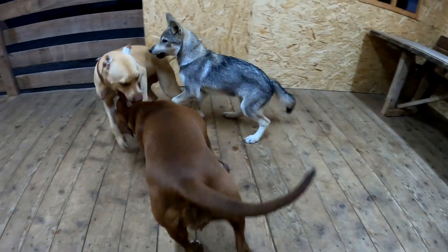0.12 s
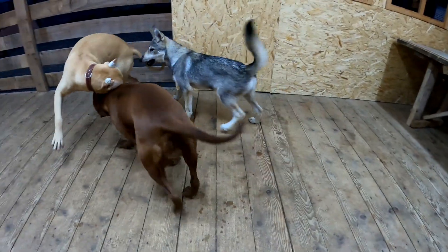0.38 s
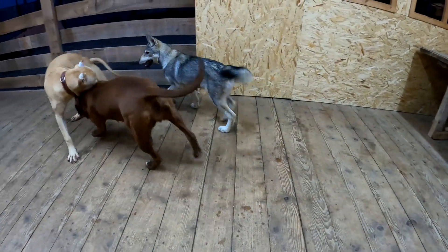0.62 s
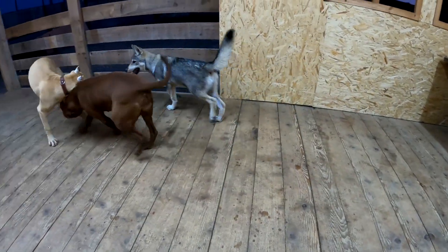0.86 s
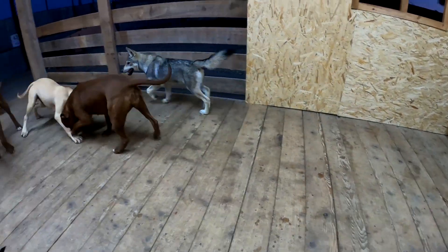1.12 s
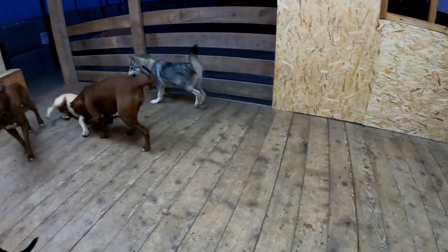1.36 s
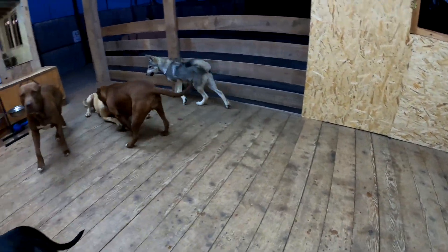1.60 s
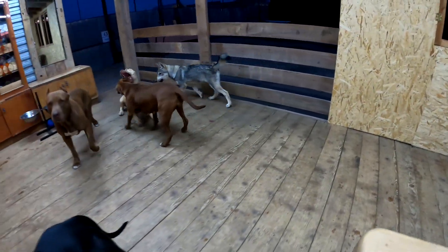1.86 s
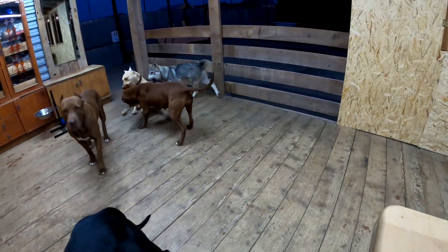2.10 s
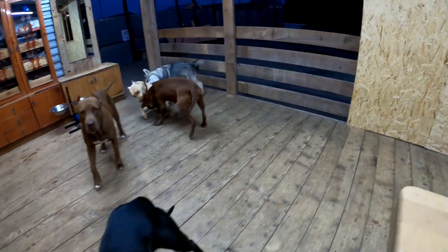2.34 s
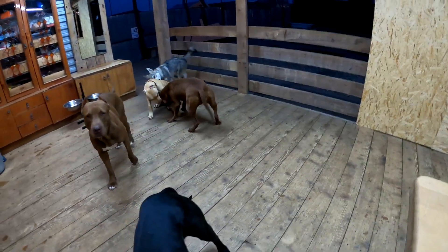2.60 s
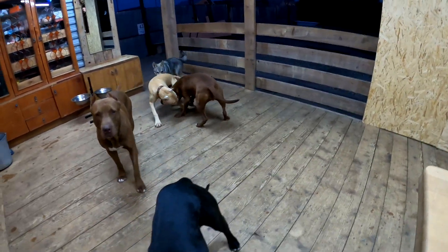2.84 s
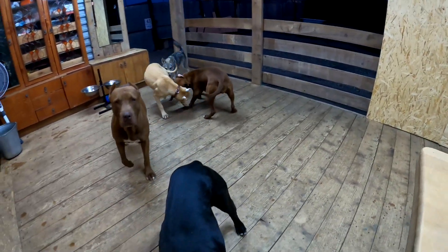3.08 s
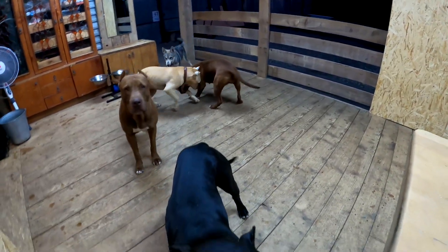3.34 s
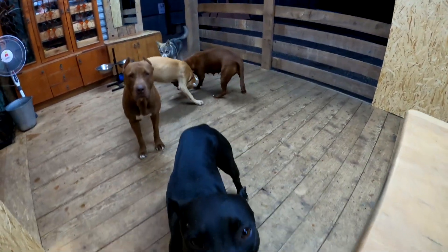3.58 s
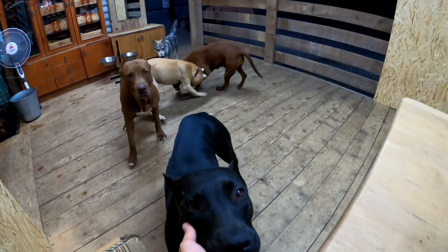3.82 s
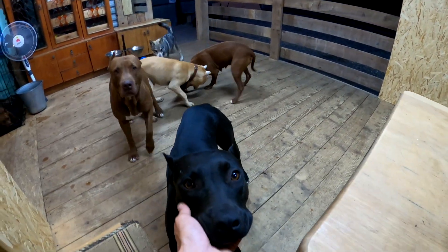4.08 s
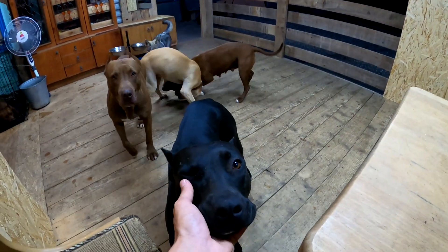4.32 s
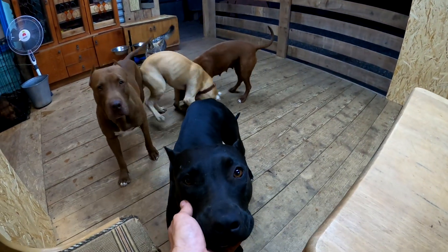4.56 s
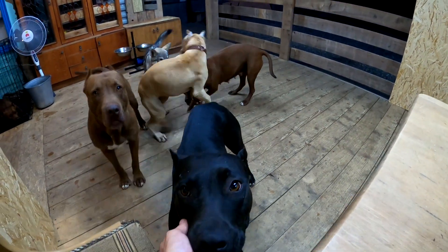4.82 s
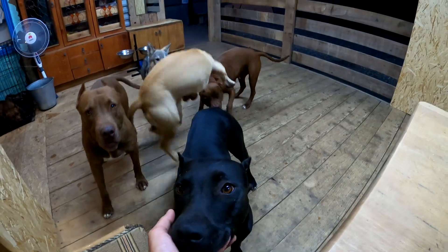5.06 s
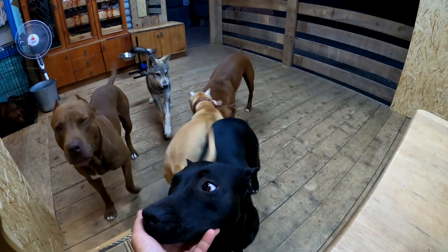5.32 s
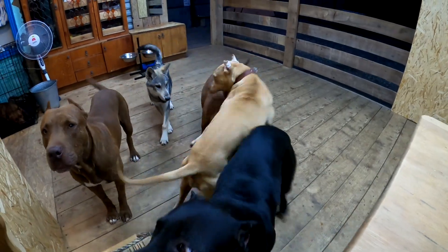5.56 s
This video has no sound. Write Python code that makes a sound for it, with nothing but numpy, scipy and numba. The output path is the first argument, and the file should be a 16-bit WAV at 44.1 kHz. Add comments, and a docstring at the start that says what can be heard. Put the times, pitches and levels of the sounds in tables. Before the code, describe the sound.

Large dogs scuffle on a resonant plank floor in a wooden shed, heard by a slightly muffled hand-held stereo microphone. From 0 to 0.8 s, rapid low thuds, knocks and gritty claw ticks tumble over dragging weight, with a tiny tag clink. Claws scrape around 1.0-1.3 s, then a loud cluster of slams hits at 1.35-1.57 s. It thins out: scratches near 2.05 s, steps at 2.37 and 2.7 s, faint clinks around 2.5 s. Wet jaw smacks come slightly left at 2.95-3.05 s, then a short low grunt at 3.2 s whose pitch dips and recovers, and a very faint wheeze at 3.3 s. A scrape at 3.8 s leads to a sharp claw strike at 3.94 s; irregular steps follow until 5 s. Thin nasal wheezes and faint panting emerge near 5.2 s, among heavy thumps at 5.28, 5.35 and 5.66 s. Short wooden reflections and quiet air throughout.

```python
"""Dogs wrestling in a wooden shed

Large dogs wrestle on the plank floor of a wooden shed, a few metres from a hand-held camera.
Pads and bodies thud and knock as decaying board modes; tags clink as beating pairs of sines.
Claws tick and scratch as noise grains through plank resonances; sliding paws are gritty noise bands.
One dog smacks its jaws (mouth modes), grunts (a hum with overtones), wheezes and pants (shaped noise).
Delay lines make the brief answer of the wooden walls, over a low shuffle and the hush of the room."""
import sys
import numpy as np
from scipy import signal
from scipy.fft import rfft, irfft, next_fast_len
from scipy.io import wavfile
from scipy.ndimage import uniform_filter1d
from numba import njit

SR = 44100
rng = np.random.default_rng(int(sys.argv[2]) if len(sys.argv) > 2 else 0)


def how_loud(loudness_db):
    """Turn decibels into a plain amplitude multiplier (0 dB gives 1, 20 dB gives 10)."""
    steps = np.asarray(loudness_db, float) / 20
    return 10 ** steps


def inscribe(sig):
    """Save sig as 16-bit PCM at rate SR to the path in sys.argv[1].

    A 1-D sig is mono; a 2-D sig holds one channel per row.
    Samples are clipped to [-1, 1] before scaling.
    """
    pcm = np.round(np.clip(np.atleast_2d(sig).T, -1, 1) * 32767)
    wavfile.write(sys.argv[1], SR, pcm.astype(np.int16))


N = 250468
T = np.arange(N) / SR
OPPOSITE = np.array([[1], [-1]])  # left and right in opposite phase

# Modes of the boards on their joists.
# Each row: pitch in Hz, level in dB, t60 in seconds before the ring factor of a blow.
BOARDS = [(39.6, 7, 0.44), (56.9, 9, 0.12), (70, 3, 0.47), (97, 2.5, 0.2), (127.7, 0.5, 0.16),
          (142.75, -3.5, 0.52), (178, -2.5, 0.32), (208, -1, 0.24), (235, 5, 0.14), (273.8, -7.5, 0.34),
          (298.2, -4.5, 0.35), (321.5, 1, 0.29), (366, -0.5, 0.24), (439.5, 5, 0.21), (503, 2, 0.25),
          (569, 1.5, 0.14), (600, 2.5, 0.17), (697, 7.5, 0.11), (746, 1, 0.23), (808, 2.5, 0.2),
          (923.5, -1, 0.17), (990, -1.5, 0.22), (1069, 5, 0.046), (1161, -3, 0.18), (1323, 1, 0.1),
          (1477, 1, 0.093)]
# What the plank face rings with under a claw.
# Each row: pitch in Hz, width in Hz that scales the band around it, level in dB.
FACE = [(985, 52, -7.5), (1170, 340, 5), (1393, 130, -5), (1521, 107, 0), (1634, 94, 1.5), (1753, 140, -1),
        (2053, 360, -0.5), (2500, 210, -8.5), (2850, 230, -33.5), (3610, 62, -5.5), (3720, 280, -23),
        (4500, 310, 0.5), (4920, 250, -0.5), (5630, 730, -0.5), (6330, 490, -5)]


def butter_pass(x, order, hz, kind="bandpass"):
    """Butterworth filter: its slopes fall smoothly outside the passed band."""
    return signal.sosfilt(signal.butter(order, hz, kind, fs=SR, output="sos"), x)


def band(x, low_hz, high_hz):
    """Band-pass, rms 1."""
    y = butter_pass(x, 2, [low_hz, high_hz])
    return y / np.sqrt(np.mean(y ** 2))


def colour(x, points, share=1):
    """Shape the spectrum by (Hz, dB) points, joined along log frequency; share scales the dB."""
    hz, db = np.transpose(points)
    pad = SR // 10
    x = np.pad(x, pad, mode="reflect", reflect_type="odd")
    size = next_fast_len(len(x))
    f = np.maximum(np.fft.rfftfreq(size, 1 / SR), 1)
    gain = how_loud(share * np.interp(np.log(f), np.log(hz), db))
    return irfft(rfft(x, size) * gain, size)[pad:pad + N]


def decay(t, t60):
    """Exponential fade that falls by 60 dB in t60 seconds."""
    return np.exp(-np.log(1000) * t / t60)


def add(out, s, x):
    """Mix a short sound in at a given time in seconds."""
    i = int(s * SR)
    out[..., i:i + x.shape[-1]] += x[..., :N - i]


def grit(rate, spread_db):
    """Tiny catches of claw on grain: random clicks (rate per second) of uneven size, spread slightly widened."""
    hits = rng.random(N) < rate / SR
    return hits * rng.standard_normal(N) * how_loud(spread_db * rng.exponential(size=N))


def hush():
    """Steady air of the shed: coloured noise, alike left and right in the bass."""
    # Spectrum of the air. Each row: frequency in Hz, density in dB per Hz before the level is set.
    air_curve = [(18, -39), (30, 10.5), (71, -10), (185, -11), (253, -16.5), (364, -37.5), (511, -18),
                 (680, -84), (928, -24), (8920, -26.5), (15000, -44.5)]
    level_db = -50
    mid, side = (colour(rng.standard_normal(N), air_curve) for _ in range(2))
    side = butter_pass(side, 2, [1200, 9000])
    return how_loud(level_db) * (mid + side * OPPOSITE) / np.sqrt(np.mean(mid ** 2))


def patches(count):
    """Gains that come and go as paws catch and let go, one row for each band."""
    patchy_db, per_s = 2.8, 25
    k = int(SR / per_s)
    held = np.repeat(rng.standard_normal((count, N // k + 1)), k, axis=1)[:, :N]
    return how_loud(patchy_db * uniform_filter1d(held, k // 2))


def face(x):
    """The same scratching heard through each resonance of the plank face, one row each."""
    return np.array([how_loud(db) * band(x, hz - 0.49 * width, hz + 0.92 * width) for hz, width, db in FACE])


def slide():
    """Dragged weight rumbles in the boards; dragged claws scrape in fine grains, unlike left and right."""
    # Restless shuffling between the blows.
    # Each row: time in seconds, level of the bass, of the middle and of the treble in dB.
    shuffle = [(0.0, -22, -23, -53), (.1, -35, -47.5, -47), (.3, -30, -37.5, -49), (.39, -42, -47, -46.5),
               (0.54, -45, -46.5, -44), (1.03, -29.5, -40.5, -50), (1.2, -34.5, -50.5, -51),
               (1.345, -54, -32, -41), (1.37, -56, -39, -51.5), (1.41, -48.5, -29.5, -42.5),
               (1.53, -28, -23.5, -53), (1.68, -40, -45, -42.5), (2.2, -50.5, -48.5, -52),
               (2.59, -46.5, -50.5, -45), (2.81, -51, -53.5, -57), (3.31, -39, -53, -49),
               (3.8, -51.5, -61, -55), (3.98, -40.5, -58, -45.5), (4.38, -54.5, -41, -46),
               (4.7, -37, -52, -45.5), (4.97, -42, -57, -51.5), (5.28, -44, -45, -50.5),
               (5.68, -43, -46.5, -43.5)]
    fizz_db = -9
    extra_fizz_db = 1.5  # a fast skid is brighter than a shuffle
    s, *columns = np.transpose(shuffle)
    skid_gains = skids()
    bass, middle, treble = how_loud([np.interp(T, s, c) for c in columns]) + skid_gains

    rumble, rub = grit(600, 1.2), grit(1500, 1.5)
    low = bass * band(rumble, 31, 182) + middle * patches(1)[0] * band(rub, 160, 770)

    mid, side = (grit(9000, 0.56) for _ in range(2))
    ringing = (patches(len(FACE)) * face(mid)).sum(axis=0) / 4
    ringing += 0.75 * patches(1)[0] * band(mid, 1260, 3850)
    scrape = treble * (ringing + 0.51 * OPPOSITE * band(side, 900, 4400))

    fizz_gain = how_loud(fizz_db) * (treble * patches(1)[0] + how_loud(extra_fizz_db) * skid_gains[2])
    fizz_side = band(band(side, 4000, 8500), 4000, 8500)
    fizz = fizz_gain * (band(mid, 4660, 10300) + 0.74 * OPPOSITE * fizz_side)
    return low + scrape + fizz


def strike_boards(level_db, hz, ring, octaves, push_s, chance):
    """One blow: the spot where it lands favours the modes near one pitch; a longer push swells slower."""
    t = np.arange(int(.4 * SR)) / SR
    mode_hz, mode_db, t60 = (c[:, None] for c in np.transpose(BOARDS))
    nearness = np.exp(-(np.log2(mode_hz / hz) / octaves) ** 2 / 2)
    share = how_loud(mode_db + 2 * chance[0]) * nearness
    heard = share[:, 0] > share.max() / 100  # skip modes 40 dB below the strongest
    phase = 2 * np.pi * mode_hz * (1 + 0.022 * chance[1]) * t[None] + 1.04 * chance[2]
    fade = decay(t, t60[heard] * max(ring, .15))
    x = np.sum(share[heard] * fade * np.sin(phase[heard]), axis=0)
    x = x * (1 - np.exp(-t / push_s)) ** 2
    # the strength of the blow sets the energy of its first 60 ms; peaks stand about three times higher
    return how_loud(level_db) * x / np.sqrt(np.mean(x[:int(.06 * SR)] ** 2)) / 3


def paws():
    """Soft thuds and hard knocks on the same boards; each knock adds a clack of higher modes."""
    # Soft pads taking weight.
    # Each row: start in seconds, approximate peak in dB, favoured pitch in Hz, ring factor on the t60.
    pad_blows = [(.003, -13, 88, 0.3), (0.036, -8.5, 95, 0.6), (.064, -16.5, 107.5, 0.77),
                 (0.1, -17.5, 96, 0.72), (0.138, -16.5, 147, 0.47), (0.211, -15, 127, 1),
                 (0.257, -20, 120, 0.55), (0.486, -20, 128, .6), (0.585, -31, 98, 0.5),
                 (.735, -15.5, 97, .7), (0.793, -22, 76, 0.67), (0.932, -31, 52.7, 0.27),
                 (1.002, -21.5, 57.7, 0.82), (1.101, -23.5, 80, 1), (1.35, -4.5, 178, 0.42),
                 (1.374, -20, 100.5, 0.87), (1.44, -15.5, 108.4, 0.4), (1.54, -13, 106, .6),
                 (1.563, -15.5, 98.6, .6), (1.621, -24.5, 89.4, .7), (1.699, -28.5, 69.7, 0.84),
                 (2.255, -31, 72, 0.37), (2.381, -16.5, 90.7, 0.94), (2.67, -28, 73, .39),
                 (2.742, -18, 75, 0.56), (2.792, -26, 84.5, .7), (2.827, -34, 187, 0.54),
                 (2.94, -28, 145, 1), (3.119, -31.5, 69.4, 0.82), (3.583, -27.5, 200, 0.23),
                 (3.794, -29, 210, 0.2), (3.816, -24, 155, 0.59), (3.955, -20, 130, 0.69),
                 (3.981, -13.5, 74.3, 0.86), (4.071, -25, 70.5, 0.14), (4.286, -25.5, 99, 1),
                 (4.428, -17, 84, 0.95), (4.531, -21, 52, 0.79), (4.586, -17, 77, 1),
                 (4.757, -32.5, 85, 0.5), (4.887, -23.5, 41, 0.68), (4.983, -20.5, 61.6, 0.71),
                 (5.147, -28, 76, 0.52), (5.277, -9, 44.2, .8), (5.29, -17.5, 92, .5),
                 (5.352, -7, 105, 0.58), (5.389, -18, 62.5, 0.99), (5.402, -20.5, 113, .6),
                 (5.549, -34.5, 98, 0.55), (5.656, -7.5, 101.6, 1)]
    # Hard knocks of bone and heel. Each row: start in seconds, approximate peak in dB, favoured
    # pitch in Hz, clack in dB over the knock, clack pitch in Hz, ring factor on the t60.
    heel_blows = [(.005, -16, 246, -2, 466, 0.58), (.03, -16.5, 294, -10, 524, 0.7),
                  (0.134, -38, 173, 10.5, 580, .7), (0.219, -27.5, 190, 6, 650, 0.51),
                  (0.321, -25.5, 188, -10, 726, 0.89), (0.405, -25, 178, -20, 920, 0.47),
                  (0.424, -28, 300, -1.5, 970, 1), (.479, -19.5, 230, 0.5, 556, 0.53),
                  (.481, -24, 397, -3.5, 980, 0.58), (.527, -20, 190, -9.5, 580, 0.74),
                  (.684, -41, 464, 15.5, 1050, 0.9), (0.731, -21.5, 303, -3, 940, 0.35),
                  (.743, -17, 197, -4.5, 494, 0.21), (0.759, -18.5, 183, -9.5, 590, 0.33),
                  (0.893, -37.5, 350, 2.5, 610, 1), (1.1, -18, 366, -3.5, 487, 1),
                  (1.14, -16.5, 438, -5, 485, 0.51), (1.349, -4, 320, -9, 770, 0.54),
                  (1.351, -7.5, 457, -15, 1050, 0.69), (1.366, -16.5, 298, -11, 900, 0.71),
                  (1.381, -9, 204, -17, 915, 0.65), (1.393, -9, 415, -17, 900, .6),
                  (1.415, -22, 340, -10, 600, 0.61), (1.445, -21.5, 298, -12, 527, 0.86),
                  (1.489, -18, 250, -2.5, 566, 0.36), (1.492, -25, 800, -1.5, 1310, 0.26),
                  (1.505, -23.5, 298, -4.5, 1210, 1), (1.532, -11, 455, -4.5, 803, 0.51),
                  (1.557, -18, 202, -7, 515, .6), (2.059, -34.5, 445, 6, 910, 1),
                  (2.314, -37, 396, -14, 541, 1), (2.368, -23, 295, -3, 710, 0.82),
                  (2.439, -24.5, 203, -14, 990, 0.36), (2.574, -37, 477, -14, 600, 0.8),
                  (2.664, -22.5, 333, -22, 1150, 0.42), (2.675, -33, 380, 1, 634, .6),
                  (2.695, -21.5, 342, -7, 594, 0.69), (2.721, -24.5, 187, -7, 420, 1),
                  (3.327, -21, 232, -3.5, 660, 0.6), (3.329, -32, 406, 1.5, 890, 1),
                  (3.348, -30, 320, -6, 835, 1), (3.37, -23, 200, -10, 705, 0.59),
                  (3.444, -28, 185, -6, 746, 0.49), (3.577, -32.5, 185, -12, 1110, 0.92),
                  (3.825, -16.5, 189, -12.5, 503, .7), (3.943, -19.5, 235, -4.5, 1000, 0.92),
                  (3.947, -28.5, 480, -0.5, 1400, 1), (4.048, -23, 178, -9.5, 456, 0.81),
                  (4.056, -27, 328, -9.5, 960, 0.57), (4.189, -16.5, 233, -6, 565, 0.49),
                  (4.2, -19.5, 228, 0, 525, 0.73), (4.224, -24, 580, -11, 586, 0.61),
                  (4.237, -23, 214, -6, 580, 0.17), (4.264, -20, 226, -10.5, 670, 0.36),
                  (4.274, -22, 218, -6, 553, 0.64), (4.427, -32.5, 250, -5, 497, .7),
                  (4.439, -15.5, 168, -18, 497, 0.55), (4.517, -26.5, 247, -1.5, 985, 0.35),
                  (4.602, -28, 233, -8, 608, 0.93), (4.863, -35.5, 212, -7, 980, .7),
                  (4.985, -21.5, 337, -7.5, 486, 0.91), (5.161, -29, 203, -6.5, 480, 0.81),
                  (5.268, -19, 261, 0.5, 690, .5), (5.284, -14, 288, -4.5, 560, 0.35),
                  (5.302, -25.5, 276, 7.5, 585, 0.5), (5.351, -13, 490, -12, 1410, 0.41),
                  (5.363, -9, 302, -11.5, 490, 0.75), (5.396, -19, 277, -16, 517, 0.53),
                  (5.43, -33, 310, -15, 600, 0.53), (5.568, -29, 200, -33.5, 485, 0.38),
                  (5.662, -21, 186, -4, 875, 0.9)]
    pad_push_s, heel_push_s, clack_push_s = 0.0049, 0.0015, 0.0005
    pad_octaves, heel_octaves, clack_octaves = 0.4, 0.22, 0.2
    out = np.zeros(N)
    chance = rng.standard_normal((len(pad_blows) + len(heel_blows), 3, len(BOARDS), 1))
    for (s, db, hz, ring), c in zip(pad_blows, chance):
        add(out, s, strike_boards(db, hz, ring, pad_octaves, pad_push_s, c))
    for (s, db, hz, clack_db, clack_hz, ring), c in zip(heel_blows, chance[len(pad_blows):]):
        add(out, s, strike_boards(db, hz, ring, heel_octaves, heel_push_s, c))
        clack = strike_boards(db + clack_db, clack_hz, 1.23 * ring, clack_octaves, clack_push_s, c)
        add(out, s - .001, clack)  # each clack starts 1 ms before its row's time
    return out


def claws():
    """A gritty scratch that swells and dies away, ringing the plank face most near its own pitch."""
    # Claws striking wood. Each row: start in seconds, approximate peak in dB, brightest pitch in Hz,
    # rise in seconds, level in dB of the added top.
    strokes = [(.003, -19.5, 1200, 0.00069, -25), (0.0165, -28, 1750, 0.00068, 9),
               (.0917, -24.5, 3200, 0.003, -7), (0.1827, -25.5, 4500, 0.0077, -3.5),
               (0.214, -20, 1210, 0.00091, -18), (0.251, -22.5, 3500, 0.0007, -45),
               (.3351, -30, 1430, 0.0015, -25), (0.407, -31.5, 3300, 0.0036, -15),
               (0.42, -22, 2390, 0.0025, -20.5), (.458, -49, 3300, 0.0055, -24),
               (0.476, -21, 1270, 0.00063, -21), (0.5186, -21, 1400, 0.0014, -35),
               (0.581, -24.5, 2200, 0.00084, -36), (.6405, -23, 2890, 0.0025, -4),
               (0.6822, -17.5, 1420, 0.0036, -25), (0.7334, -21.5, 1400, 0.024, -11),
               (0.781, -26, 1330, 0.0043, -26.5), (.893, -37, 2370, .004, -2),
               (0.9728, -19.5, 2480, 0.0077, -46), (1.016, -26, 2400, 0.0037, -2),
               (1.096, -20.5, 1200, 0.0026, -30), (1.123, -33, 1200, 0.0064, -8),
               (1.24, -23.5, 1140, 0.013, -25), (1.3448, -26.5, 1230, .004, -22),
               (1.409, -20.5, 2050, .02, -18), (1.42, -24, 2640, 0.0087, -18),
               (1.444, -35, 2900, .006, -28), (1.487, -21, 1220, 0.003, -20),
               (1.523, -24.5, 1390, 0.0032, -28), (1.58, -30, 1290, 0.0022, -4),
               (1.64, -27, 1300, 0.0023, -31), (1.749, -32, 3280, 0.0036, -35),
               (1.816, -29, 2160, 0.033, -38), (1.958, -28.5, 2550, 0.0046, -22),
               (2.051, -21.5, 2340, 0.015, -26), (2.06, -20, 1560, 0.003, -17),
               (2.2306, -31.5, 1400, 0.0037, -28), (2.3135, -30, 2860, 0.0034, -26),
               (2.365, -17, 1280, 0.008, -32), (2.377, -20.5, 2850, 0.0099, -16),
               (2.427, -37, 2500, 0.01, -26), (2.442, -22.5, 1170, 0.0037, -13),
               (2.6624, -18, 1270, 0.0019, -34), (2.84, -40, 4500, 0.0021, -2),
               (2.95, -34, 2500, .002, -9.5), (3.159, -32.5, 2200, 0.0025, -35),
               (3.178, -35.5, 4400, 0.0012, -31), (3.3247, -26, 2390, 0.0011, -34),
               (3.35, -36, 1900, .01, -32), (3.4385, -27, 1300, 0.004, -23),
               (3.791, -16.5, 3070, 0.035, -8), (3.9388, -11.5, 1820, 0.0022, -21.5),
               (3.968, -30, 1640, 0.006, -36), (4.0474, -24.5, 1640, .0024, -18),
               (4.188, -24.5, 1270, 0.004, -6.5), (4.362, -20.5, 2200, 0.0083, -29),
               (4.369, -22, 3600, 0.0015, -25), (4.428, -22.5, 2730, 0.0016, -16),
               (4.5141, -19, 2140, 0.00095, -34), (4.5773, -29, 2050, 0.0038, 14),
               (4.7494, -39, 1870, 0.003, -44), (4.9827, -27, 1400, 0.0006, -6),
               (5.019, -27.5, 2600, 0.016, -44), (5.07, -34, 2200, 0.0085, -35),
               (5.131, -38, 1370, 0.0033, -14), (5.1692, -36, 1580, .006, -3),
               (5.199, -49, 1020, .004, -32), (5.267, -19.5, 1300, 0.021, -9.5),
               (5.3497, -17.5, 1390, 0.0084, -6.5), (5.6567, -27, 1170, 0.0033, -26)]
    scratch_t60_s, side_db = 0.19, -7.5
    spot_scatter_db, spot_detune = 3.5, 0.05
    half_octaves = 0.36  # the scratch's own band reaches this far either side of its pitch
    out, size = np.zeros((2, N)), int(.3 * SR)
    t = np.arange(size) / SR
    face_hz = np.array(FACE)[:, 0]

    rough = np.append(grit(14000, 1.4), np.zeros(2 * size))
    aside = band(band(rng.standard_normal(len(rough)), 500, 8000), 500, 8000)
    rings, dull = face(rough), band(rough, 640, 2970)
    bright, top = band(rough, 1820, 3790), band(rough, 2600, 9300)
    chance = rng.standard_normal((len(strokes), len(FACE) + 1))
    for (s, db, hz, rise, top_db), (*c, spot) in zip(strokes, chance):
        start = int(s * SR)
        part = slice(start, start + size)
        nearness = np.exp(-(np.log2(face_hz / hz) / 0.089) ** 2 / 2)
        share = how_loud(spot_scatter_db * np.array(c)) * (0.84 + nearness)
        x = share @ rings[:, start:start + 2 * size] / np.linalg.norm(share)
        # every spot on the planks is tuned a little differently
        x = np.interp(t * (1 + spot_detune * spot), np.arange(2 * size) / SR, x)
        x = x + 0.32 * band(rough[part], hz * 2 ** -half_octaves, hz * 2 ** half_octaves)
        # a low stroke is duller, a high one brighter
        x = x + 0.75 * (dull[part] * (1500 / hz) ** 2 + 0.43 * bright[part] * hz / 2000)
        # the top dies fastest: it is mostly the first tick
        x = x + how_loud(top_db) * top[part] * (1 + 2.1 * np.exp(-t / 0.0061))
        x = x + how_loud(side_db) * aside[part] * OPPOSITE
        tick = .5 * np.exp(-t / 0.0017) * np.minimum(t / 0.00029, 1)
        swell = 1 - np.exp(-t / rise)
        x = x * (tick + swell) * decay(t, scratch_t60_s)
        # the energy of the first 30 ms sets the level
        add(out, s, how_loud(db) * x / np.sqrt(np.mean(x[:, :int(.03 * SR)] ** 2)) / 4.24)
    return out


def clutter(x, gain=0.63):
    """Furniture and slats scatter the sound: chained all-pass delays turn each click into a dense spray."""
    # Delays of the scattering surfaces, a single list [samples].
    scatter_lags = [97, 151, 229, 347]
    for lag in scatter_lags:
        taps = np.zeros(lag + 1)
        taps[0], taps[-1] = -gain, 1
        x = signal.lfilter(taps, taps[::-1], x)
    return x


@njit
def walls(x, lags, gain, damp):
    """Eight delay lines that feed each other, duller on every round."""
    line, soft, out = np.zeros((8, 4096)), np.zeros(8), np.zeros((2, len(x)))
    for i in range(len(x)):
        total = 0.
        for k in range(8):
            returned = gain[k] * line[k, (i - lags[k]) & 4095]
            soft[k] += (1 - damp) * (returned - soft[k])
            total += soft[k]
            out[k % 2, i] += soft[k]
        for k in range(8):
            # the tiny offset keeps the fading numbers from slowing the loop
            line[k, i & 4095] = x[i] + 1e-18 + soft[k] - total / 4
    return out


def shed(near):
    """Wooden walls answer the scattered sound; two close ports hear only its long waves alike."""
    # Delays between the walls, a single list [samples].
    wall_lags = np.array(np.array([611, 797, 983, 1187, 1361, 1583, 1831, 2083]))
    t60_s, damp = 0.21, 0.4  # t60 before damping, which shortens the treble
    echo_db, scatter_db = -7, -15
    spray = clutter(near.mean(axis=0))
    echo = walls(spray, wall_lags, how_loud(-60 * wall_lags / SR / t60_s), damp)
    echo = butter_pass(echo, 1, 250, "highpass")
    mid, side = echo.mean(axis=0), (echo[0] - echo[1]) / 2
    side = butter_pass(side, 1, [450, 8000])
    # the scattered treble differs between the ports
    scattered = butter_pass(spray, 4, [3500, 9000])
    side = how_loud(echo_db) * 0.49 * side + how_loud(scatter_db) * scattered
    return how_loud(echo_db) * mid + side * OPPOSITE


def ticks():
    """A bare click of horn on wood: a broad burst that dies within a few hundredths of a second."""
    # Single nails tapping the wood. Each row: time in seconds, peak in dB, pitch in Hz.
    taps = [(0.1316, -29, 2770), (0.2174, -33, 2780), (0.2531, -16.5, 3700), (0.3347, -28.5, 2500),
            (0.4197, -45, 3170), (.464, -31, 3300), (0.48, -21, 1400), (0.5194, -38, 3200),
            (0.583, -25.5, 4040), (0.6446, -27.5, 2870), (0.6828, -19, 1490), (0.7302, -17.5, 1500),
            (0.785, -17, 3970), (0.894, -31, 1200), (0.9383, -37, 4120), (0.9725, -19, 3300),
            (1.347, -27, 5000), (1.49, -22, 1500), (1.58, -31, 6000), (2.5376, -38, 4410),
            (3.051, -38, 2560), (3.7755, -36, 2720), (3.9432, -14.5, 3500), (4.188, -30, 1210),
            (4.268, -29, 2900), (4.3768, -17.5, 3600), (4.5175, -19, 2900), (4.8633, -36, 2600),
            (5.1326, -34.5, 2970), (5.246, -37, 2810), (5.265, -42, 5260), (5.279, -23, 2850),
            (5.3547, -17.5, 2530)]
    t60_s, half_octaves = 0.027, 0.72
    out, t = np.zeros(N), np.arange(int(.02 * SR)) / SR
    for (s, db, hz), noise in zip(taps, rng.standard_normal((len(taps), len(t)))):
        x = band(noise, hz * 2 ** -half_octaves, hz * 2 ** half_octaves) * decay(t, t60_s)
        add(out, s - .001, how_loud(db) * x / np.abs(x).max())  # starts 1 ms before its row's time
    return out


def tags():
    """A close pair of modes, beating as it dies."""
    # Collar tags and buckles clinking faintly.
    # Each row: start in seconds, level of the lower mode in dB, its pitch in Hz, t60 in seconds.
    clinks = [(.2, -31, 3740, 0.048), (.465, -37, 3260, 0.088), (.655, -44, 5000, .15),
              (.685, -50, 4500, .12), (1.755, -39, 3330, 0.12), (1.815, -39, 2230, 0.12),
              (1.96, -44, 2600, 0.088), (2.455, -33, 1205, 0.17), (2.502, -45, 1240, 0.093),
              (2.537, -34, 4340, 0.055), (3.09, -50, 2200, .08), (3.18, -37, 4260, 0.046),
              (3.275, -43.5, 2960, .08), (3.365, -44, 2120, .1), (4.515, -30, 2130, 0.071)]
    out, t = np.zeros(N), np.arange(int(.15 * SR)) / SR
    for (s, db, hz, t60), c in zip(clinks, rng.standard_normal(len(clinks))):
        upper_hz = hz * (1.03 + 0.0079 * c)
        x = np.sin(2 * np.pi * hz * t) + 0.69 * np.sin(2 * np.pi * upper_hz * t)
        add(out, s, how_loud(db) * x * (1 - np.exp(-t / 0.0011)) * decay(t, t60))
    return out


def skids():
    """Bass, middle and treble gain of the longer skids: a quick swell, a hold, a fade."""
    # Longer skids over the planks.
    # Each row: start in seconds, length before the fade in seconds, bass, middle and treble in dB.
    drags = [(0.466, 0.14, -28.5, -43, -69), (1.114, 0.18, -46.5, -34, -37.5),
             (1.495, 0.069, -28, -37, -46), (3.334, 0.13, -41.5, -50, -55.5), (3.927, 0.063, -44, -38, -71),
             (4.532, 0.074, -34.5, -43, -51), (4.984, 0.083, -34, -41, -49.5)]
    rise_s, fade_s = 0.0084, 0.027
    out = np.zeros((3, N))
    for s, length, *db in drags:
        swell = np.clip((T - s) / rise_s, 0, 1)
        out += how_loud(db)[:, None] * swell * np.exp(-np.maximum(T - s - length, 0) / fade_s)
    return out


def smacks():
    """A wet pop rings the open mouth as decaying modes; it stands to the left."""
    # Jaws of the nearest dog smacking open and shut.
    # Each row: start in seconds, peak in dB before panning, ring factor on the t60.
    pops = [(2.902, -51, 0.81), (2.919, -46, 1), (2.95, -32, 0.47), (3.029, -32.5, 0.51), (3.05, -22, 0.54),
            (3.081, -44, 0.9), (3.557, -31, 0.47)]
    # Modes of the mouth. Each row: pitch in Hz, level in dB, t60 in seconds before the ring factor.
    mouth_modes = [(195, 4.5, 0.094), (495, 8, 0.044), (650, -3.5, 0.091), (1406, 4.5, 0.019),
                   (1590, -11.5, 0.067), (2550, -4.5, 0.027)]
    pan_db = 3.5  # left minus right
    out, t = np.zeros(N), np.arange(int(.15 * SR)) / SR
    hz, mode_db, t60 = (c[:, None] for c in np.transpose(mouth_modes))
    chance = rng.standard_normal((len(pops), 2, len(mouth_modes), 1))
    for (s, db, ring), c in zip(pops, chance):
        fade = decay(t, t60 * ring) * (1 - np.exp(-t / 0.0018))
        tone = np.sin(2 * np.pi * hz * (1 + 0.057 * c[1]) * t)
        x = np.sum(how_loud(mode_db + 0.78 * c[0]) * fade * tone, axis=0)
        add(out, s, how_loud(db) * x / np.abs(x).max())
    return out * how_loud(pan_db * OPPOSITE / 2)


def grunt():
    """A hummed tone whose pitch sags and recovers; its overtones ring the mouth, most near start and end."""
    # One short grunt.
    # Each row: time in seconds, pitch in Hz, level of the fundamental in dB, of the overtones in dB.
    contour = [(3.157, 195, -43, -40), (3.167, 178, -26, -37.5), (3.186, 141.5, -26.5, -52),
               (3.205, 139, -25, -50), (3.225, 140, -23.5, -57), (3.243, 148, -25, -47),
               (3.253, 171, -35, -39), (3.268, 178.5, -27, -52), (3.289, 169, -44, -54)]
    # Mouth resonances. Each row: centre in Hz, width in Hz, level in dB.
    formants = [(292, 68, 6), (490, 120, 4), (1400, 150, -22), (1580, 150, -3.5)]
    jitter = 0.006  # rms share of the pitch
    s, hz, db, upper_db = np.transpose(contour)
    wobble = uniform_filter1d(rng.standard_normal(N), size=200)
    pitch = np.interp(T, s, hz) * (1 + jitter * wobble / wobble.std())
    phase = 2 * np.pi * np.cumsum(pitch) / SR
    gate = np.clip(np.minimum(T - s[0], s[-1] - T) / 0.01, 0, 1)
    order = np.arange(2, 14)[:, None]
    share = sum(how_loud(g) / (1 + (2 * (order * pitch - f) / width) ** 2) for f, width, g in formants)
    upper = how_loud(np.interp(T, s, upper_db)) * np.sum(share * np.sin(order * phase), axis=0)
    hum = how_loud(np.interp(T, s, db)) * np.sin(phase)
    return np.sqrt(2) * gate * (hum + upper)


def wheezes():
    """A narrow, wavering whistle of air that glides a little: a tone modulated by slow noise."""
    # Thin wheezes in a dog's nose.
    # Each row: start in seconds, length of the glide in seconds, level in dB, start and end pitch in Hz.
    whistles = [(3.298, 0.27, -52, 888, 910), (4.718, 0.063, -53, 910, 950), (4.85, 0.069, -52, 1069, 1123),
                (5.087, 0.081, -52.5, 1010, 1050), (5.188, 0.036, -40.5, 1080, 1086),
                (5.232, 0.024, -52, 1110, 1120), (5.222, 0.055, -53, 1620, 1640)]
    width_hz, edge_s = 43, 0.013
    out, t = np.zeros(N), np.arange(SR // 4) / SR  # each stops after a quarter second at most
    for (s, length, db, start_hz, end_hz), noise in zip(
            whistles, rng.standard_normal((len(whistles), 2, len(t)))):
        a, b = uniform_filter1d(noise, int(SR / width_hz))
        phase = 2 * np.pi * np.cumsum(np.interp(t, [0, length], [start_hz, end_hz])) / SR
        x = (0.49 + a / a.std()) * np.sin(phase) + b / b.std() * np.cos(phase)
        add(out, s, how_loud(db) * x * np.clip(np.minimum(t, length - t) / edge_s, 0, 1))
    return out


def pant():
    """Fluttering breath noise through two mouth resonances."""
    # The nearest dog breathing through its open mouth.
    # Each row: time in seconds, level in dB before the trim below.
    breath = [(4.6, -70), (4.804, -78), (4.944, -65), (5.182, -46), (5.538, -46), (5.68, -47)]
    # Mouth resonances. Each row: centre in Hz, width in Hz, level in dB.
    open_mouth = [(1016, 100, -9), (1620, 220, 4)]
    trim_db, onset_s = -7.5, 0.11
    s, db = np.transpose(breath)
    air = grit(810, 1.2)
    x = sum(how_loud(g) * band(air, hz - width / 2, hz + width / 2) for hz, width, g in open_mouth)
    return how_loud(np.interp(T, s, db) + trim_db) * np.clip((T - s[0]) / onset_s, 0, 1) * x


def scene():
    """Blows, scratches and smacks reach the camera directly and again off the walls."""
    # Where the wrestling pair stands. Each row: time in seconds, left minus right in dB.
    place = [(0, -.5), (.6, -1), (1.2, 0), (1.8, -1.5), (2.4, -0.7), (3.1, -0.2), (3.7, -1), (4.3, -1),
             (4.9, -0.5), (5.68, -0.5)]
    pan_db = np.interp(T, *np.transpose(place))
    wrestling = paws() + claws() + ticks() + tags()
    near = wrestling * how_loud(OPPOSITE * pan_db / 2) + smacks()
    return near + shed(near) + slide() + pant() + wheezes() + grunt() + hush()


def low_pass(x):
    """Removes everything above the highest recorded frequency."""
    return signal.sosfilt(signal.butter(12, 15690, fs=SR, output="sos"), x)


def record(dry):
    """The housing dulls the top and shades the ports unequally, the left a sample late; peaks are rounded."""
    # Response of the microphone. Each row: frequency in Hz, gain in dB.
    response = [(20, -8.5), (60, 5), (600, -2), (800, -5.5), (1000, -1.5), (3000, -4.5), (6000, -6),
                (8000, -11.5), (11000, -17), (15000, -12)]
    # Unequal shading of the two ports. Each row: frequency in Hz, left minus right in dB.
    port_tilt = [(60, 1), (110, 1.17), (200, 1.25), (380, 2.3), (700, 3.2), (1290, 3), (2380, 4.5),
                 (4400, 3), (8120, -1.5), (15000, -2.5)]
    left = colour(np.append(0, dry[0, :-1]), port_tilt, share=.5)
    right = colour(dry[1], port_tilt, share=-.5)
    x = np.array([colour(left, response), colour(right, response)])
    return low_pass(np.tanh(0.77 * x) / 1.067)


dry = scene()
out = record(dry)
inscribe(out)
```